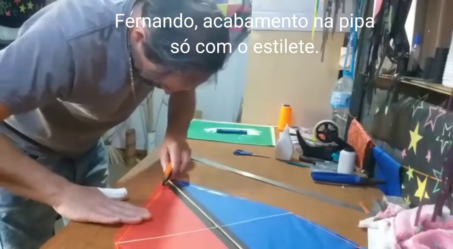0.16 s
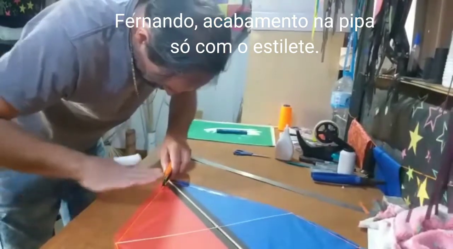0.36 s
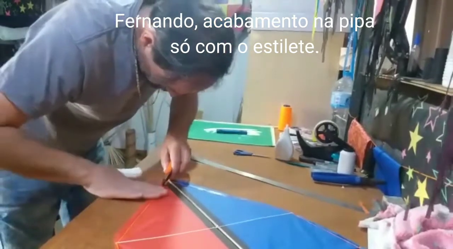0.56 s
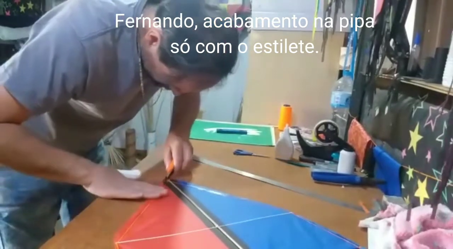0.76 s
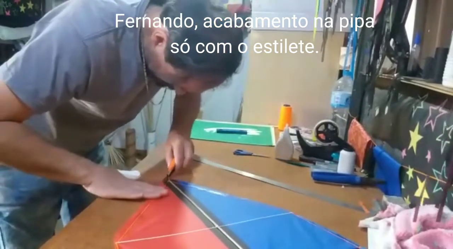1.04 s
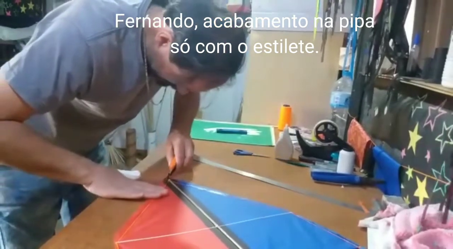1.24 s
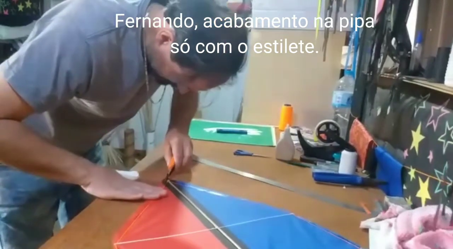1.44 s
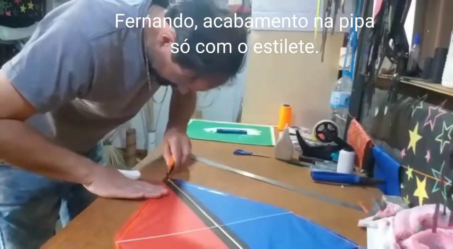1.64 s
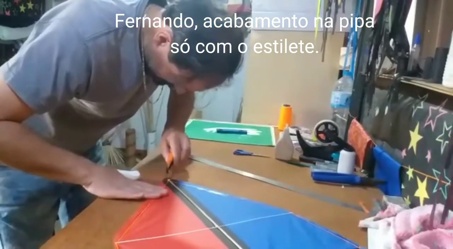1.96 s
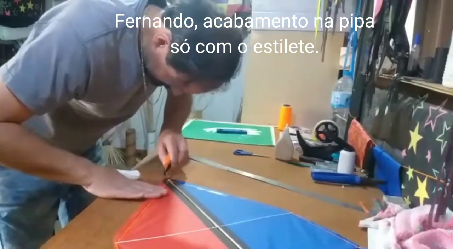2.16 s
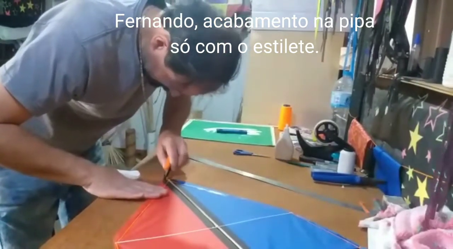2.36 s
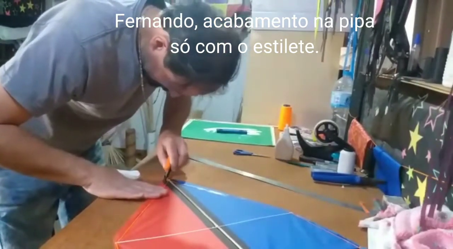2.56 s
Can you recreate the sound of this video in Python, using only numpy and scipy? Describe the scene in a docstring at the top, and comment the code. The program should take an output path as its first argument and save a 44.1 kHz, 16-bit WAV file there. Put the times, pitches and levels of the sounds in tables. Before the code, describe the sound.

A craft knife trims a kite on a wooden bench: a sharp clack, a hand thumping down and sliding over the sail, one firm ringing knock, then small clicks, close in a small humming workshop.

```python
"""A dull hum and a soft, low rustle fill a small workshop, where a craft knife trims a kite on a wooden bench.
The hum is wavering low tones over filtered noise; thin, faint whistles are high tones that come and go.
A hand lands on the sail with a thump and slides over it: noise bursts, low bench tones and grainy noise.
The blade clicks against the spar and the bench: short cracks of noise with pings, and one firm ringing knock.
A sharp clack, airy squeaks, soft low-mid swells and the scrape of the blade along the sail are shaped noise."""
import sys
import numpy as np
from scipy import signal
from scipy.io import wavfile
from scipy.ndimage import uniform_filter1d

SR = 44100
rng = np.random.default_rng(int(sys.argv[2]) if len(sys.argv) > 2 else 0)


def transcribe(signal):
    """Save signal, clipped to [-1, 1], as a 16-bit WAV file at the path in sys.argv[1]."""
    frames = np.atleast_2d(signal).T
    limited = np.clip(frames, -1, 1)
    pcm = np.round(limited * 32767).astype(np.int16)
    wavfile.write(sys.argv[1], SR, pcm)


N = 119070  # 2.7 s
TIME = np.arange(N) / SR
RING_TIME = np.arange(SR * 3 // 4) / SR  # clock of one struck sound and its reverberation, 0.75 s


def amp(db):
    """Turns decibels into a gain."""
    return 10 ** (np.asarray(db) / 20)


def unit(x):
    """Scales a signal to an rms of 1."""
    return x / np.sqrt(np.mean(x ** 2) + 1e-20)


def fade(t60):
    """Dies away exponentially, by 60 dB in t60 seconds."""
    return amp(-60 * RING_TIME / t60)


def add(mix, start_s, sound):
    """Mixes a sound in at its start time, cut off at the end of the mix."""
    part = mix[max(round(start_s * SR), 0):][:len(sound)]
    part += sound[:len(part)]


def read(points, hz):
    """Reads a (pitch_hz, level_db) curve at any pitch, on a log-frequency axis."""
    points_hz, points_db = np.transpose(points)
    return np.interp(np.log(hz + 1), np.log(points_hz), points_db)


# Centres of the four bands that set the brightness of a knife contact or a pat: knock, mid, treble, fizz [Hz]
BAND_CENTRES_HZ = (900, 2300, 5800, 12000)


def colour(x, points, bands_db=None, size=4096):
    """Filters a sound to a given spectrum at unit power, then applies any band levels, with no pre-echo."""
    hz = abs(np.fft.fftfreq(size, 1 / SR))
    gain = unit(amp(read(points, hz)))
    if bands_db is not None:
        gain = gain * amp(read(list(zip(BAND_CENTRES_HZ, bands_db)), hz))
    # minimum phase: the filter responds as early as it can
    spectrum = np.exp(np.conj(signal.hilbert(np.log(gain + 1e-7))))
    taps = np.fft.ifft(spectrum).real
    return signal.fftconvolve(x, taps[:size // 2])[:len(x)]


def even_noise(count, size=256):
    """Makes noise with its power spread evenly over time and frequency."""
    x = rng.standard_normal(count)
    for _ in range(3):
        z = signal.stft(x, nperseg=size)[2]
        x = signal.istft(z / (abs(z) + 1e-12), nperseg=size)[1][:count]
    return unit(x)


def waver(size=900):
    """Drifts slowly and randomly with an rms of 1; size is the smoothing in samples."""
    smooth = uniform_filter1d(rng.standard_normal(N), size)
    return unit(uniform_filter1d(smooth, size))


# Nearby surfaces throw back quick reflections, weaker for the knife
NEAR_DB, NEAR_KNIFE_DB, NEAR_T60_S = -4, -5, 0.084


def near(x, wet_db, above_hz=700):
    """Small surfaces add quick reflections above the bass, which ripple the spectrum."""
    taps = even_noise(len(RING_TIME)) * fade(NEAR_T60_S) * (RING_TIME > .001)
    taps = signal.sosfilt(signal.butter(2, above_hz, "high", fs=SR, output="sos"), taps)
    wet = signal.fftconvolve(x, taps / np.linalg.norm(taps))[:len(x)]
    return (x + amp(wet_db) * wet) / np.hypot(1, amp(wet_db))


# Early reflections and the late tail of the workshop
EARLY_DB, EARLY_T60_S, LATE_DB, LATE_T60_S = -3.5, 0.12, -17.5, 0.36
ROOM_TOP_HZ = 9000  # the walls absorb the highest treble
# A contact builds up briefly; its reflections crackle unevenly
ATTACK_S, CRACKLE_DB = 0.00073, 3


def burst(length_s, room_db=0):
    """A brief uneven crack is followed by dense, duller reflections from bench and walls."""
    direct_power = np.exp(-(RING_TIME / length_s) ** 2)
    early = amp(EARLY_DB) * fade(EARLY_T60_S)
    late = amp(LATE_DB) * fade(LATE_T60_S)
    room_power = signal.fftconvolve(direct_power / direct_power.sum(), early ** 2 + late ** 2)
    room_power = abs(room_power[:len(RING_TIME)])
    dull = signal.lfilter(*signal.butter(1, ROOM_TOP_HZ, fs=SR), even_noise(len(RING_TIME), size=128))
    crackle = unit(amp(CRACKLE_DB * waver(size=50)[:len(RING_TIME)]))
    build_up = 1 - np.exp(-RING_TIME / ATTACK_S)
    crack = np.sqrt(direct_power) * even_noise(len(RING_TIME), size=64) * build_up
    return crack + amp(room_db) * np.sqrt(room_power) * crackle * dull


GRAINS_PER_S, GRAIN_SPREAD_DB = 700, 2  # average rate of the catches, and how uneven they are


def friction(levels, spectrum, smooth=0.58):
    """Rubbing is many tiny catches of uneven size over a smooth hiss, following a level curve."""
    catches = rng.random(N) < GRAINS_PER_S / SR
    signs = rng.choice([-1, 1], N)
    size_db = GRAIN_SPREAD_DB * np.minimum(rng.exponential(1, N), 4)
    grains = catches * signs * amp(size_db)
    rub = colour(unit(grains) + smooth * rng.standard_normal(N), spectrum)
    level_db = np.interp(TIME, *np.transpose(levels), left=-120, right=-120)
    return unit(rub) * amp(level_db)


# Tones of the hum: pitch_hz [Hz], level_db [dB]
HUM_TONES = [(81, -77), (119.5, -59.5), (194, -67), (242, -77)]
HUM_WAVER_HZ = 3.17
# Spectrum of the steady room noise: pitch_hz [Hz], level_db [dB]
ROOM_NOISE_COLOUR = [(25, -51), (45, 0), (62, -4.5), (85, 4), (120, 0), (155, -1), (200, -6), (330, -8.5),
                     (420, -18), (800, -24), (1500, -37), (3000, -33), (4000, -28.5), (6000, -42.5),
                     (9000, -42.5), (15500, -36.5)]
ROOM_NOISE_DB = -58.5


def workshop():
    """Low tones whose pitch drifts make the hum, over steady, mostly low noise."""
    hum = np.zeros(N)
    for hz, db in HUM_TONES:
        pitch = hz + HUM_WAVER_HZ * waver()
        hum += np.sqrt(2) * amp(db) * np.sin(2 * np.pi * np.cumsum(pitch) / SR)
    noise = unit(colour(rng.standard_normal(N), ROOM_NOISE_COLOUR))
    return hum + amp(ROOM_NOISE_DB) * noise


# Loudness of the soft, low rustle: time_s [s], level_db [dB]
RUSTLE_LEVELS = [(0, -61.5), (.12, -76), (.26, -59.5), (.42, -53.5), (.6, -60), (.85, -66), (1.3, -73.5),
                 (2.13, -69), (2.27, -66.5), (2.6, -62), (2.7, -61.5)]
# Spectrum of the rustle: pitch_hz [Hz], level_db [dB]
RUSTLE_SPECTRUM = [(60, -25), (180, 1.5), (330, -2.5), (550, -6.5), (800, -7.5), (1300, -20), (3000, -31),
                   (8000, -42)]


def rustle():
    """A soft rustle is grainy noise with most of its power in the low range."""
    return friction(RUSTLE_LEVELS, RUSTLE_SPECTRUM)


# Thin whistle pulses: middle_s [s], length_s [s], pitch_hz [Hz], level_db [dB]
WHISTLE_PULSES = [(.185, .075, 9800, -67), (0.235, 0.074, 9770, -64), (0.31, 0.049, 9777, -65),
                  (0.36, 0.042, 9785, -62), (.408, 0.046, 9785, -61), (.632, 0.13, 6804, -54.5),
                  (0.731, .062, 6796, -58), (0.776, .045, 6829, -57), (0.835, .042, 6840, -64.5),
                  (0.924, 0.062, 6800, -76), (1.249, 0.077, 6900, -69), (1.312, .05, 6880, -72),
                  (1.352, 0.063, 6880, -68), (1.452, 0.082, 6900, -70.5), (1.51, .04, 6880, -76),
                  (1.585, .09, 6920, -77.5)]
WHISTLE_WAVER_HZ, WHISTLE_FLUTTER_DB = 11, 1.5
WHISTLE_ROOM_DB, WHISTLE_T60_S = -6, 0.297


def whistles():
    """Faint high tones swell and drop out, each wavering around its pitch and lingering in the room."""
    out = np.zeros(N)
    for middle_s, length_s, hz, db in WHISTLE_PULSES:
        swell = np.cos(np.pi * np.clip((TIME - middle_s) / length_s, -.5, .5))
        pitch = hz + WHISTLE_WAVER_HZ * waver(size=150)
        level = amp(db + WHISTLE_FLUTTER_DB * waver(size=300))
        out += np.sqrt(2) * swell * level * np.sin(2 * np.pi * np.cumsum(pitch) / SR)
    tail = even_noise(len(RING_TIME)) * fade(WHISTLE_T60_S)
    return out + amp(WHISTLE_ROOM_DB) * signal.fftconvolve(out, tail / np.linalg.norm(tail))[:N]


# Faint, airy squeaks of rubbing, and two soft low-mid swells (the rows under 1000 Hz):
# middle_s [s], length_s [s], pitch_hz [Hz], level_db [dB]
SQUEAKS_AND_SWELLS = [(0.563, .014, 5640, -59), (.688, .014, 5720, -58), (0.725, 0.026, 5680, -57),
                      (1.317, 0.16, 2597, -77), (1.47, 0.074, 3894, -78), (2.096, 0.042, 3620, -72),
                      (2.184, 0.038, 3740, -67.5), (2.254, 0.051, 3110, -72), (2.33, 0.041, 3580, -75),
                      (2.33, 0.083, 701, -74), (2.695, 0.022, 794, -64)]
BAND_WIDTH_HZ = 420


def squeaks_and_swells():
    """Each squeak or low-mid swell is noise in one band that softly rises and falls."""
    out = np.zeros(N)
    low_pass = signal.butter(2, BAND_WIDTH_HZ / 2, fs=SR, output="sos")
    for middle_s, length_s, hz, db in SQUEAKS_AND_SWELLS:
        band = signal.sosfilt(low_pass, rng.standard_normal(N))
        swell = np.exp(-((TIME - middle_s) / length_s) ** 2)
        # multiplying by a tone moves the slow noise up to the pitch
        out += amp(db) * swell * unit(band * np.sin(2 * np.pi * hz * TIME))
    return out


# Spectrum of the clack: pitch_hz [Hz], level_db [dB]
CLACK_SPECTRUM = [(100, 0.5), (200, -6.5), (340, 3.5), (520, -6.5), (900, -8), (1200, -9), (1380, -12.5),
                  (1700, -9.5), (2100, -4), (3200, -14), (4000, -2), (5200, -5), (6400, -0.5), (7500, -5.5),
                  (8600, -22.5), (15500, -17.5)]
# The echo's time and level are relative to the clack
CLACK_S, CLACK_DB, CLACK_ECHO_S, CLACK_ECHO_DB, CLACK_T60_S = .2308, -33, .026, -3, 0.38


def clack(treble_t60_s=0.13, split_hz=4500):
    """A sharp clack, heard mostly through the room, has a wall echo and a tail whose treble dies first."""
    out = np.zeros(N)
    low_pass = signal.butter(2, split_hz, fs=SR, output="sos")
    for start_s, db in ((CLACK_S, CLACK_DB), (CLACK_S + CLACK_ECHO_S, CLACK_DB + CLACK_ECHO_DB)):
        noise = colour(rng.standard_normal(len(RING_TIME)), CLACK_SPECTRUM)
        low = signal.sosfiltfilt(low_pass, noise)
        treble = noise - low
        add(out, start_s, amp(db) * (low * fade(CLACK_T60_S) + treble * fade(treble_t60_s)))
    return out


# Pushes on the bench top: start_s [s], level_db [dB]
BENCH_PUSHES = [(0.4548, -25.5), (0.4671, -26.5), (1.028, -39.5)]
# Low tones of the bench top: pitch_hz [Hz], level_db [dB], t60_s [s]
BENCH_TONES = [(81.9, 9.5, 0.089), (103.2, 3, 0.16), (132.5, -3, 0.15), (160.5, -8.5, .18),
               (224.7, -7.5, 0.1)]
# Spectrum of the low rumble that the room holds after a thump: pitch_hz [Hz], level_db [dB]
RUMBLE_COLOUR = [(35, -28), (60, -2), (90, -1), (130, -6), (200, -17.5), (350, -20.5), (700, -55)]
RUMBLE_DB, RUMBLE_T60_S, THUMP_RISE_S = -14.5, 0.64, 0.013


def bench():
    """The pushed bench top booms in its low modes and the room rumbles on."""
    out = np.zeros(N)
    modes = sum(amp(db) * fade(t60) * np.sin(2 * np.pi * hz * RING_TIME) for hz, db, t60 in BENCH_TONES)
    rise = 1 - np.exp(-RING_TIME / THUMP_RISE_S)
    for start_s, db in BENCH_PUSHES:
        noise = unit(colour(even_noise(len(RING_TIME), size=2048), RUMBLE_COLOUR))
        rumble = amp(RUMBLE_DB) * fade(RUMBLE_T60_S) * noise
        add(out, start_s, amp(db) * (modes + rumble) * rise)
    return out


# Fingers then palm land on the sail; two small crackles follow during the slide (the last two rows):
# start_s [s], length_s [s], low_db, mid_db, treble_db, fizz_db [dB], room_db [dB]
PATS_AND_CRACKLES = [(0.4467, 0.0069, -62, -44, -44, -58, 0), (0.4513, 0.0054, -38.5, -38, -34.5, -39.5, 1),
                     (0.467, 0.0039, -22.5, -32, -38, -44, -5.5),
                     (0.4719, 0.0027, -27, -25.5, -26.5, -42, -7.5),
                     (0.751, 0.0041, -57, -44.5, -54.5, -39.5, -5.5),
                     (0.758, 0.0024, -45.5, -49.5, -59.5, -51, -6.5)]
# Spectrum of a pat or crackle: pitch_hz [Hz], level_db [dB]
PAT_SPECTRUM = [(100, -6.5), (350, -3), (540, 5.5), (700, -4.5), (950, 7), (1300, 9.5), (1600, 1),
                (3000, 0), (4200, 5.5), (6500, -1), (8800, -14.5), (14000, -7)]


def hand():
    """Fingers then palm land, and two small crackles follow: noise bursts with their own band levels."""
    out = np.zeros(N)
    for start_s, length_s, *bands_db, room_db in PATS_AND_CRACKLES:
        add(out, start_s, colour(burst(length_s, room_db), PAT_SPECTRUM, bands_db))
    return out


# Loudness of the palm sliding over the sail: time_s [s], level_db [dB]
SLIDE_LEVELS = [(.49, -50), (.53, -55.5), (.56, -50.5), (.62, -57.5), (.68, -54), (.755, -50), (.80, -57),
                (.87, -76), (.93, -72)]
# Spectrum of the slide: pitch_hz [Hz], level_db [dB]
SLIDE_SPECTRUM = [(100, -12.5), (250, -4), (550, 2), (740, 0), (1030, -2), (1510, -10.5), (1850, -4),
                  (3220, -12.5), (4300, -5), (5700, -5.5), (7000, -11), (8620, -27.5), (11600, -13.5),
                  (15500, -15.5)]


def slide():
    """The palm slides over the sail, catching on it in many tiny grains."""
    return friction(SLIDE_LEVELS, SLIDE_SPECTRUM)


# Loudness of the blade scraping along the edge of the sail: time_s [s], level_db [dB]
SCRAPE_LEVELS = [(0, -63), (.08, -81.5), (.15, -69.5), (.2, -88), (.3, -59.5), (.92, -74), (.955, -57.5),
                 (.99, -46), (1.02, -45), (1.08, -63), (1.2, -68.5), (1.36, -67.5), (1.55, -81),
                 (1.78, -82), (1.87, -62.5), (2.1, -68.5), (2.35, -82.5), (2.7, -65)]
# Spectrum of the scrape: pitch_hz [Hz], level_db [dB]
SCRAPE_SPECTRUM = [(300, 4), (1000, -2), (1700, -8), (2500, -4.5), (3200, -6.5), (5500, -1), (7000, -3.5),
                   (8800, -26), (12000, -12.5), (15000, -14.5)]


def scrape():
    """The blade scrapes along the edge of the sail, a grainy hiss that rises and falls."""
    return friction(SCRAPE_LEVELS, SCRAPE_SPECTRUM)


RING_WIDTH_HZ, RING_ECHO_DB, RING_ECHO_T60_S = 147, -14, 0.22  # a wider resonance dies sooner


def ring(hz):
    """A contact gives a short ping at one pitch, and a diffuse echo of it."""
    ping = np.exp(-np.pi * RING_WIDTH_HZ * RING_TIME) * np.sin(2 * np.pi * hz * RING_TIME)
    echo = unit(signal.fftconvolve(even_noise(len(ping), size=1024), ping)[:len(ping)])
    return 2 * ping + amp(RING_ECHO_DB) * echo * fade(RING_ECHO_T60_S)


# Tones of the knife and the bench under it: pitch_hz [Hz], level_db [dB], t60_s [s]
KNOCK_TONES = [(556, -7.5, 0.21), (913, -5, 0.14), (999, -7, 0.095), (1662, -12.5, 0.12),
               (2022, -13.5, 0.12), (2150, -14, 0.12), (2360, -13, 0.089), (3600, -8, 0.19),
               (4312, -14.5, 0.12), (4600, -10.5, 0.11), (4960, 0.5, 0.13), (5230, -5.5, 0.14),
               (6860, -12, 0.15), (6900, -3.5, 0.13)]
KNOCK_S, KNOCK_DB, KNOCK_RISE_S = 1.026, -28.5, 0.0029
MODE_BLUR = 0.99  # phase drift in radians (rms): reflections blur the modes


def firm_knock():
    """One firm knock rings the knife and the bench in many fading tones."""
    hz, db, t60 = np.transpose(KNOCK_TONES)[:, :, None]
    drift = np.array([waver(size=220)[:len(RING_TIME)] for _ in KNOCK_TONES])
    turns = hz * RING_TIME + rng.random((len(KNOCK_TONES), 1))
    tones = amp(db) * fade(t60) * np.sin(2 * np.pi * turns + MODE_BLUR * drift)
    return amp(KNOCK_DB) * tones.sum(axis=0) * (1 - np.exp(-RING_TIME / KNOCK_RISE_S))


# Knife contacts: start_s [s], length_s [s], knock_db, mid_db, treble_db, fizz_db [dB],
# ring pitch_hz [Hz], ring_db [dB]
KNIFE_CONTACTS = [(0.156, 0.017, -63.5, -55, -48, -57, 6300, -59),
                  (0.194, 0.0067, -99, -44, -52.5, -60, 2600, -66),
                  (0.9702, 0.011, -29.5, -39.5, -38.5, -57, 1280, -38.5),
                  (0.973, .004, -42, -55, -54, -60, 560, -46),
                  (1.018, 0.0051, -26, -32, -65, -38, 1010, -43),
                  (1.0257, 0.0033, -27, -21.5, -22.5, -25, 2240, -24),
                  (1.0267, 0.0043, -54, -45, -28.5, -32, 5110, -23.5),
                  (1.885, 0.0081, -54.5, -34.5, -32, -38, 2240, -44.5),
                  (1.892, 0.00059, -61, -36, -25.5, -36.5, 2300, -38.5),
                  (1.9, 0.004, -44, -46, -34.5, -39.5, 5930, -31.5),
                  (1.905, 0.0017, -78, -34, -27.5, -60, 6320, -41),
                  (1.964, .004, -71, -60, -61, -75, 2100, -55.5),
                  (2.0154, 0.0053, -53, -55, -45, -51, 2200, -47.5),
                  (2.021, 0.004, -56, -47.5, -42.5, -68, 5180, -44.5),
                  (2.156, 0.003, -75, -58, -57, -87, 3360, -64.5),
                  (2.4208, 0.0082, -40.5, -43.5, -65.5, -73, 454, -55),
                  (2.4255, 0.0029, -35, -40.5, -35, -38, 6450, -39.5),
                  (2.4275, .002, -43.5, -48, -37, -50, 5080, -36),
                  (2.4326, 0.0042, -45.5, -55, -32.5, -46, 5340, -34.5),
                  (2.436, 0.0024, -51, -62, -51, -69, 403, -42),
                  (2.457, 0.0024, -41, -43.5, -55, -71, 5230, -40),
                  (2.576, 0.0079, -86, -56, -45.5, -63, 2290, -62),
                  (2.587, 0.011, -79, -51, -42, -67, 5430, -48)]
# Spectrum of a knife contact: pitch_hz [Hz], level_db [dB]
CONTACT_COLOUR = [(60, 0), (200, -5.5), (560, -4), (750, -1.5), (1000, 1.5), (1500, -5), (2150, -3.5),
                  (2900, -9), (4000, -3), (5200, -2), (6900, 0), (8800, -15.5), (10500, -7.5), (15000, -3)]


def knife():
    """Each contact cracks and pings; the firm knock also rings the knife and the bench."""
    cracks, rings = np.zeros((2, N))
    add(rings, KNOCK_S, firm_knock())
    for start_s, length_s, *bands_db, hz, ring_db in KNIFE_CONTACTS:
        add(cracks, start_s, colour(burst(length_s), CONTACT_COLOUR, bands_db))
        add(rings, start_s, amp(ring_db) * ring(hz))
    return near(cracks, NEAR_KNIFE_DB) + rings


def scene():
    """All sources meet at one microphone."""
    rubbing = slide() + scrape() + rustle()
    background = workshop()
    reflected = near(rubbing + clack() + hand(), NEAR_DB)
    return (background + reflected + squeaks_and_swells() + whistles() + bench() + knife())[None]


def record(dry, low_cut_hz=52, top_hz=15750):
    """The microphone cuts the deepest bass, and a steep filter removes the highest treble."""
    thin = signal.sosfilt(signal.butter(6, low_cut_hz, "high", fs=SR, output="sos"), dry)
    low_pass = signal.firwin(511, top_hz, window=("kaiser", 9), fs=SR)
    return signal.oaconvolve(thin, low_pass[None], "same")


dry = scene()
out = record(dry)
transcribe(out)
```